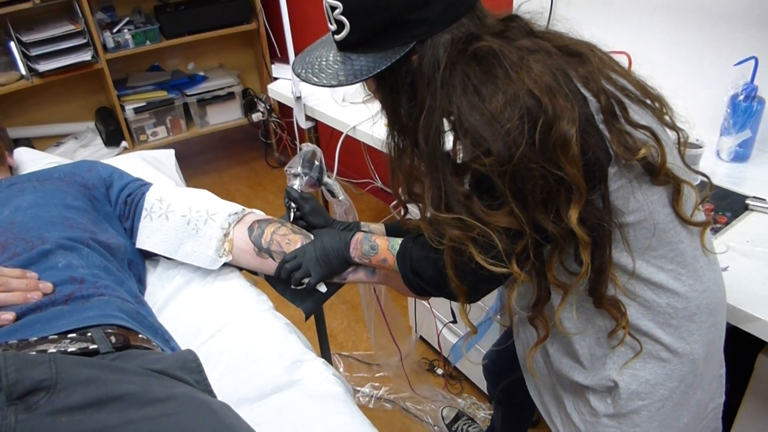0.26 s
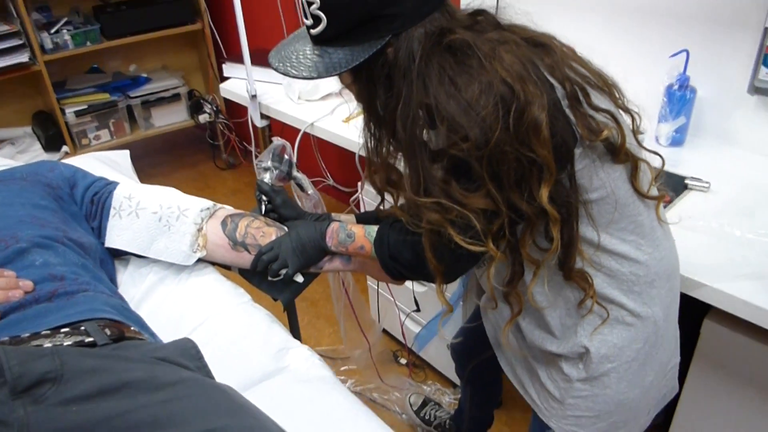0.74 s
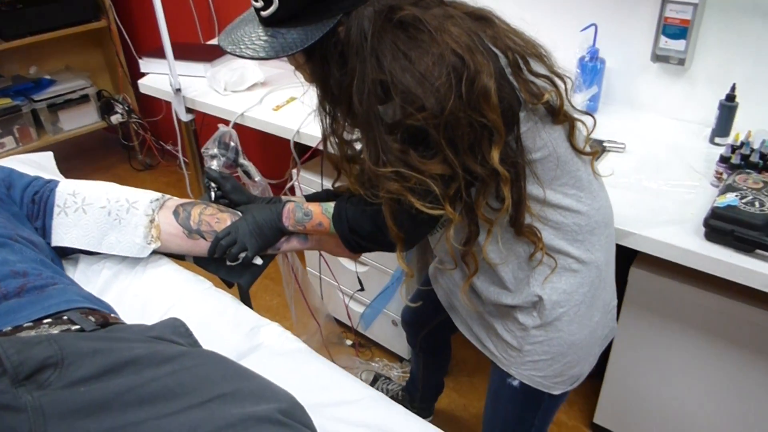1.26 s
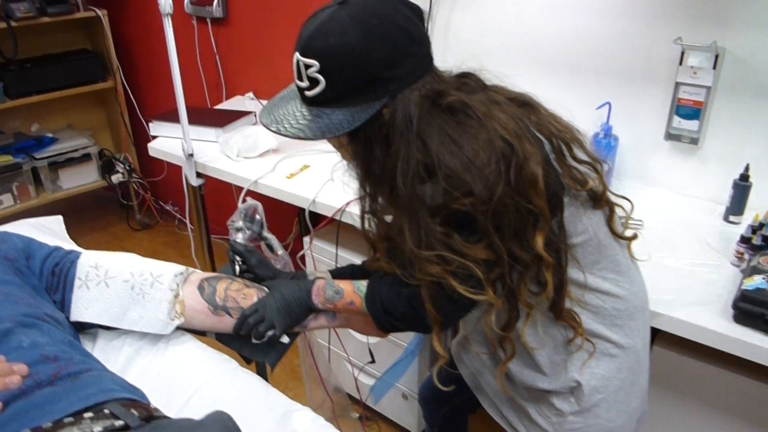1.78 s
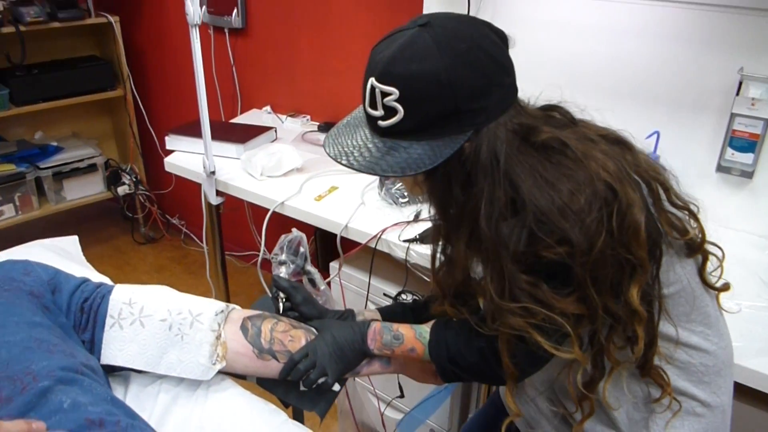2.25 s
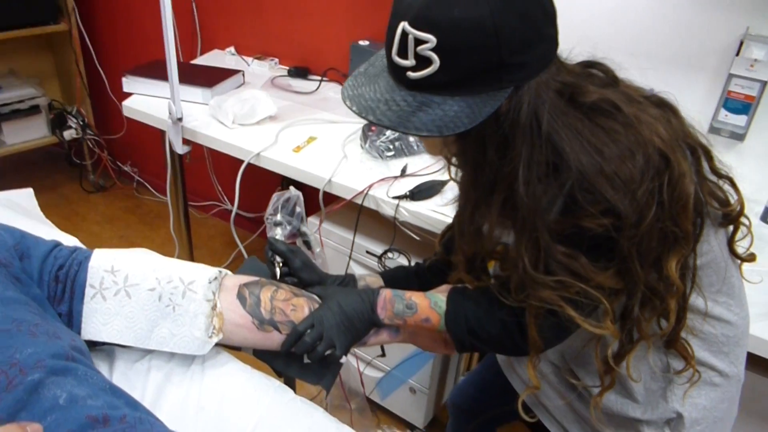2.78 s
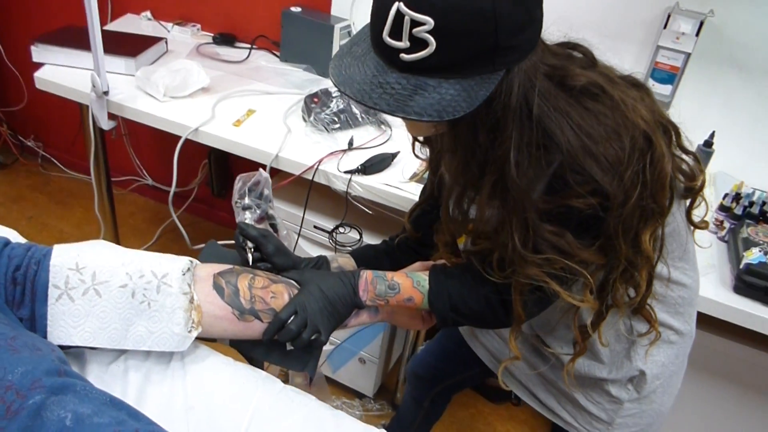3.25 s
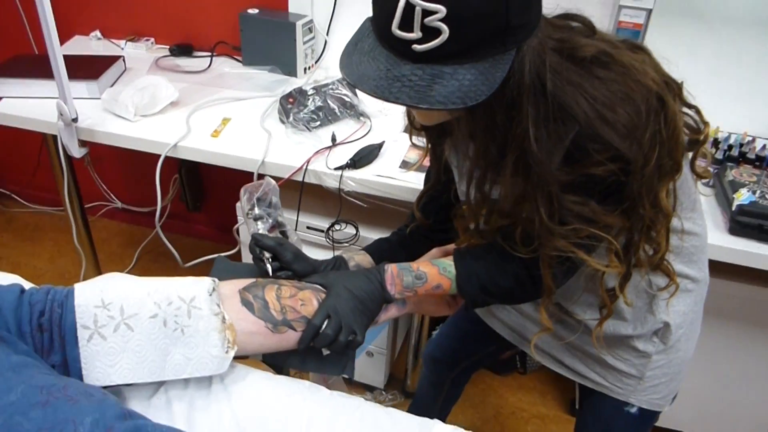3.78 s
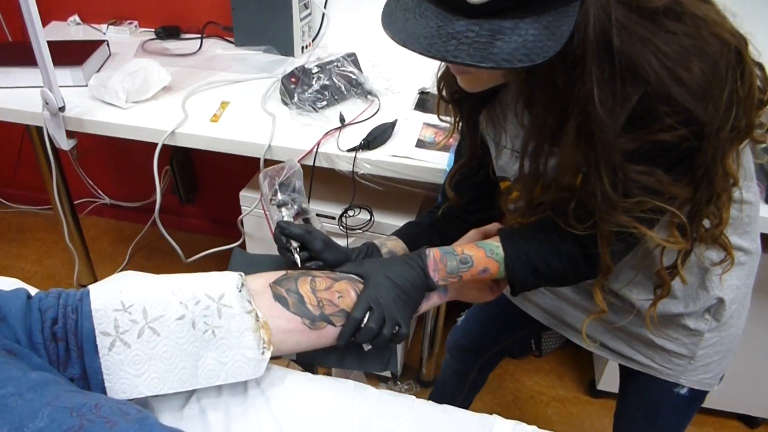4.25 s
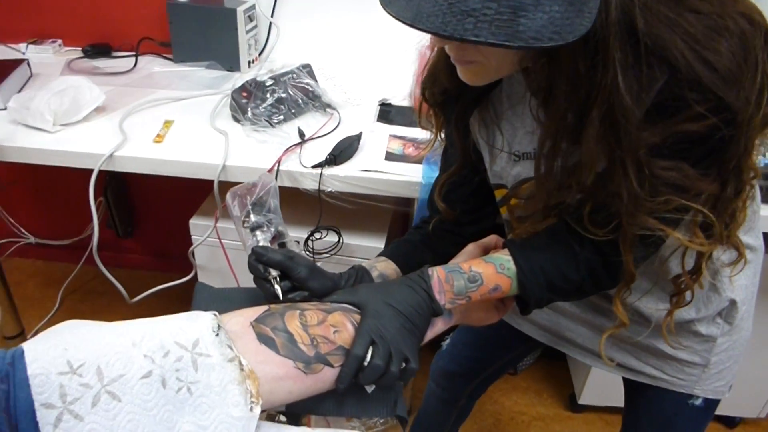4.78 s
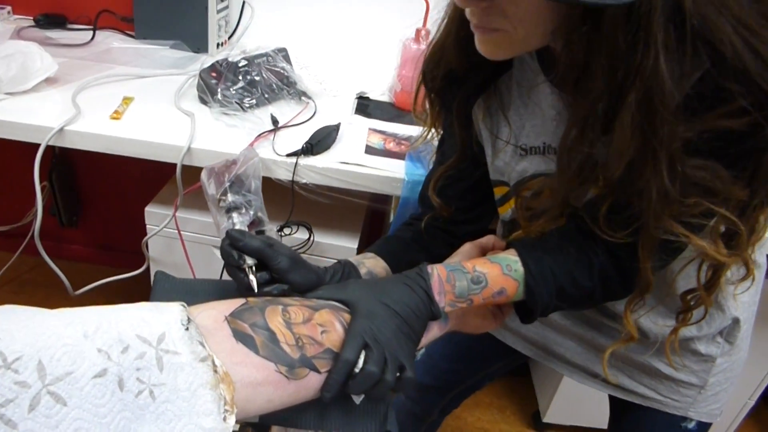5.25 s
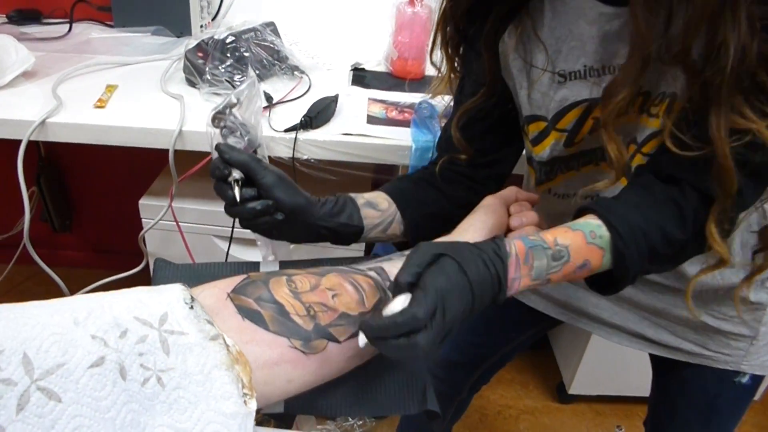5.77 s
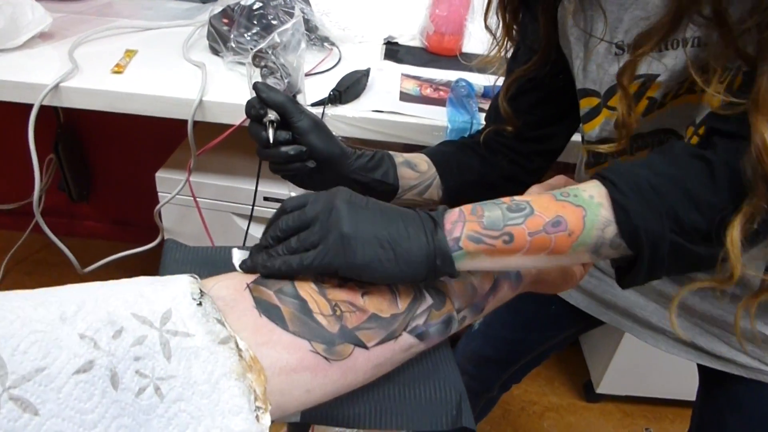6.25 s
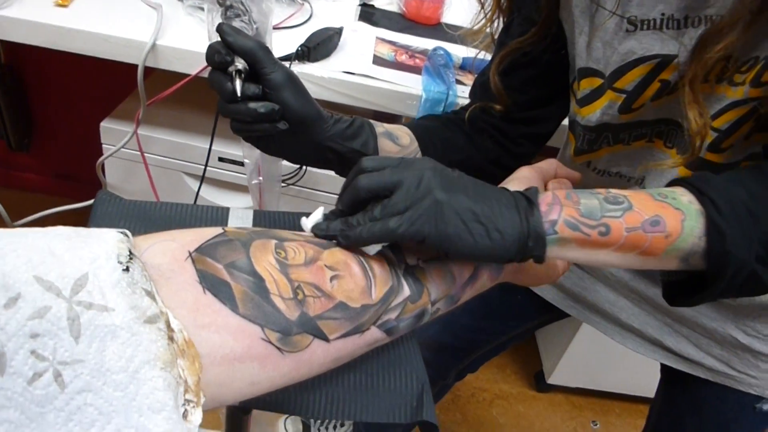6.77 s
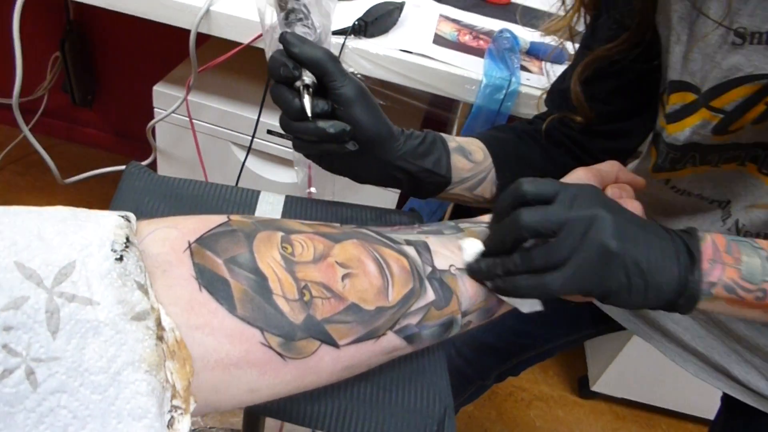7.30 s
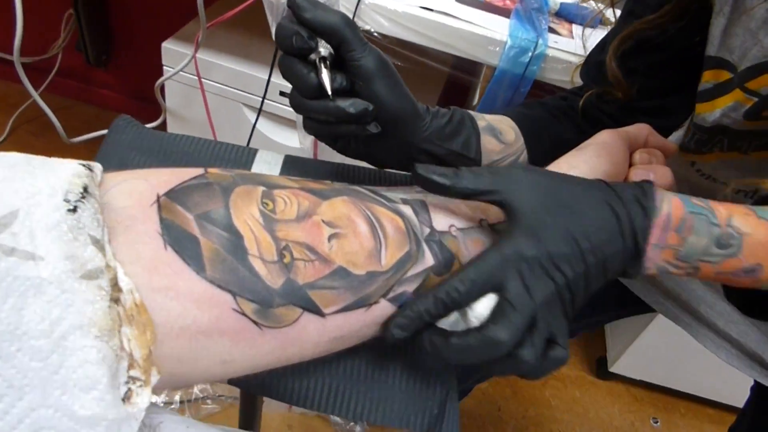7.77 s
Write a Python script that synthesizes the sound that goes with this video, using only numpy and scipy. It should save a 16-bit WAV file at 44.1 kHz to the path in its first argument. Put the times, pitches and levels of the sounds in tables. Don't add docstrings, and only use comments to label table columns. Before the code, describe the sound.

An electric tattoo machine buzzes without pause at a nearly constant low pitch, its rapid metal contacts making a bright, fizzy rasp. Faint hum lies beneath. Soft finger thumps knock the handheld camera, clustering before three seconds; a hard crack snaps near three and a half, then cloth rustles. The buzz comes closer and rings more freely toward the end in the small studio.

```python
import sys
import numpy as np
from scipy import signal
from scipy.fft import rfft, irfft, next_fast_len
from scipy.io import wavfile
from scipy.ndimage import uniform_filter1d, map_coordinates

SR = 44100
rng = np.random.default_rng(int(sys.argv[2]) if len(sys.argv) > 2 else 0)


def to_linear_factor(level_db):
    exponent = np.asarray(level_db, float) / 20
    return 10 ** exponent


def dump(signal):
    limited = np.clip(np.atleast_2d(signal).T, -1, 1)
    pcm = np.round(limited * 32767).astype(np.int16)
    wavfile.write(sys.argv[1], SR, pcm)


N = 354123


def unit(x):
    return x / np.sqrt(np.mean(x ** 2) + 1e-20)


def levelled(x):
    return x / np.sqrt(np.abs(uniform_filter1d(x[0] ** 2, size=15000)))


def along(points, hz):
    f, value = np.transpose(points)
    return np.interp(np.log(hz + 1), np.log(f + 1), value)


def curves(rows):
    seconds, *columns = np.transpose(rows)
    return [np.interp(np.arange(N) / SR, seconds, column) for column in columns]


def wobble(rate, at=None):
    grid = np.arange(0, N + 64, 64)
    knots = rng.standard_normal(int(N * rate / SR) + 4)
    coarse = map_coordinates(knots, [grid * rate / SR])
    return np.interp(np.arange(N) if at is None else at, grid, coarse)


def filtered(x, response):
    m = next_fast_len(N + SR // 2)
    return irfft(rfft(x, m) * response(np.fft.rfftfreq(m, 1 / SR)), m)[..., :N]


def padded(x):
    m = 2 * next_fast_len(N // 2 + SR // 4)
    return rfft(x, m), np.fft.rfftfreq(m, 1 / SR)


# (frequency [Hz], left minus right [dB])
LEFT = [(80, -7), (260, -3), (570, 4.5), (1050, 2.5), (2000, 0.05), (5500, 0.2), (10000, 2.5), (15500, 8)]
# (frequency [Hz], lead of the left [rad])
LEAD = [(150, -0.5), (370, 1), (560, 3), (1100, 3), (2800, 4), (3700, 4.5), (7500, 5), (16000, 5.5)]
# (frequency [Hz], left-right likeness [0-1])
ALIKE = [(300, 0.33), (800, 0.78), (2000, 0.96), (3000, 0.66), (4500, 0.98), (9000, 0.88), (14000, 0.98)]


def ports(x):
    def half(hz):
        return to_linear_factor(along(LEFT, hz) / 2) * np.exp(.5j * along(LEAD, hz))

    def right_mix(hz):
        turn = np.arccos(np.clip(along(ALIKE, hz), 0, 1))
        return np.array([np.cos(turn), np.sin(turn)]) / half(hz)

    right = filtered(x, right_mix).sum(axis=0)
    return np.array([filtered(x[0], half), right])


# (frequency [Hz], spectrum level [dB])
HUM = [(25, -23), (50, -12.5), (120, 1), (220, -2.5), (450, -7.5), (900, -6), (1650, 0.5), (2000, -8),
       (4000, -56)]


def room_tone():
    air = rng.standard_normal((2, N)) * to_linear_factor(1.86 * wobble(14) + 1.3 * wobble(1.56))
    return to_linear_factor(-51.0) * ports(unit(filtered(air, lambda hz: to_linear_factor(along(HUM, hz)))))


# (time [s], half length [s], level [dB])
RUSTLES = [
    (0.945, .04, -61),
    (1.2, .12, -74),
    (1.48, 0.03, -77),
    (2.626, 0.063, -50),
    (4.27, 0.057, -42.5),
    (5.78, .03, -57),
]
# (frequency [Hz], spectrum level [dB])
CLOTH = [(300, -12.5), (900, -3), (1700, 3), (4000, -26), (9000, -53)]


def rustles():
    t = np.arange(N) / SR
    stroke = sum(to_linear_factor(db) * np.exp(-((t - s) / half) ** 2) for s, half, db in RUSTLES)
    grains = rng.standard_normal((2, N)) * to_linear_factor(12.0 * wobble(60))
    return stroke * ports(unit(filtered(grains, lambda hz: to_linear_factor(along(CLOTH, hz)))))


def pushes(touches):
    push = np.zeros(N + SR)
    for s, db, contact_ms in touches:
        length = int(contact_ms * SR / 1200) + 2
        push[int(s * SR):][:length] += to_linear_factor(db) * np.hanning(length)
    return push[:N]


# (start [s], length [s], touch rate [1/s], level [dB])
FIDGETS = [
    (.2, .75, 7, -45),
    (3.39, .7, 12.2, -41.5),
    (4.85, 1, 5.2, -53),
    (6.401, .75, 14, -40),
    (7.584, .22, 11, -53),
]


def fidgets():
    contact_ms, spread_db = 4.45, 1
    touches = []
    for start, length, rate, db in FIDGETS:
        chance = rng.random((20, 3))
        times = start + (np.arange(20) + chance[:, 0]) / rate
        for s, (_, a, b) in zip(times, chance):
            if s < start + length:
                touches.append((s, db + spread_db * 2 * (2 * a - 1), contact_ms * (0.6 + 0.4 * b)))
    return touches


# (time [s], peak level [dB], contact [ms])
KNOCKS = [(0.625, -40, 5.3), (1.344, -37, 3.8), (1.955, -36, 1.7), (2.236, -32.5, 6.5), (2.415, -36.5, 5.6),
          (2.472, -33.5, 2.8), (2.653, -36.5, 4.6), (2.692, -29.5, 5.9), (2.718, -28.5, 6.7),
          (2.749, -32, 5.6), (2.777, -26, 5.2), (3.026, -30.5, 6.3), (3.208, -38.5, 8.1),
          (3.4613, -8.5, 0.91), (3.486, -24.5, 2.2), (4.08, -34.5, 6.6), (4.25, -25.5, 4.6),
          (4.436, -29.5, 7.2), (4.599, -33.5, 6.6), (4.66, -33.5, 5.8), (5.975, -27, 2.4), (6.06, -36, 4.3),
          (6.196, -35.5, 5), (6.616, -33, 7.3), (6.724, -35.5, 4.6), (6.754, -35, 5.5), (6.948, -29, 5.9),
          (7.367, -33.5, 3.2), (7.823, -30.5, 6.8), (7.874, -23, 5)]
# (time [s], peak level [dB], contact [ms])
TAPS = [
    (3.4614, -15.5, 0.27),
    (4, -48, 2.5),
    (4.2, -42, 2.7),
]


def knocks():
    def shell(f):
        swing = 1j * f / 170 / (1 - (f / 170) ** 2 + 1j * f / 170 / 1.17)
        return swing * (1j * f / 90 / (1 + 1j * f / 90))

    def snap(f):
        return shell(f) * 1j * f / 170 / (1 - (f / 750) ** 2 + 1j * f / 750 / 2.2)

    def far_port(f):
        return .25 - 0.16 * (1j * f / 800 / (1 + 1j * f / 800)) ** 2

    def crack(f):
        centre_hz, wide_hz = 1100, 1400
        return (1j * f * wide_hz / (centre_hz ** 2 - f * f + 1j * f * wide_hz)) ** 2

    right = to_linear_factor(5.0) * filtered(pushes(KNOCKS + fidgets()), shell)
    right += to_linear_factor(3.5) * filtered(pushes(TAPS), snap)
    cracks = to_linear_factor(6) * filtered(pushes(TAPS), crack) * [[1], [0.28]]
    return np.array([filtered(right, far_port), right]) + cracks


# (frequency [Hz], t60 [s])
STUDIO = [(300, 0.34), (2000, 0.11), (10000, 0.091)]


def tails(count, speedup):
    noise = rng.standard_normal((2, count, SR // 8))
    hz, t, z = signal.stft(noise, SR, nperseg=128)
    decay = to_linear_factor(-60 * speedup * t / along(STUDIO, hz)[:, None])
    return signal.istft(z * decay, SR, nperseg=128)[1]


def shifting(x, speedup, hop_s):
    hop = int(hop_s * SR)
    steps = N // hop + 2
    pieces = np.pad(x, (hop, (steps + 1) * hop - N))
    pieces = np.lib.stride_tricks.sliding_window_view(pieces, 2 * hop)[::hop][:steps]
    pieces = pieces * np.sin(np.pi * np.arange(2 * hop) / (2 * hop))
    wet = signal.fftconvolve(pieces[None], tails(steps, speedup), axes=2)
    out = np.zeros((2, (steps + 3) * hop + wet.shape[2]))
    for k in range(steps):
        out[:, k * hop:k * hop + wet.shape[2]] += wet[:, k]
    return unit(out[:, hop:hop + N])


# (time [s], rate [Hz])
SPEED = [
    (0.0, 109.7),
    (1.38, 108.4),
    (1.7, 109.5),
    (2.59, 109.2),
    (5.01, 109.5),
    (6.22, 110.8),
    (8.03, 109.2),
]


def cycles():
    return np.cumsum(curves(SPEED)[0] * (1 + 0.00051 * wobble(5))) / SR


def clicks(at, size):
    index = np.floor(at)[:, None] + np.arange(-7, 9)
    off = index - at[:, None]
    shape = np.sinc(off) * np.cos(np.pi * off / 16) ** 2
    index = np.clip(index, 0, N).astype(int)
    return np.bincount(index.ravel(), (shape * size[:, None]).ravel(), N + 1)[:N]


# (share of stroke [0-1], level [dB], low edge [Hz], high edge [Hz], timing scatter [us])
CONTACTS = [
    (0, 4.5, 1870, 8570, 1.8),
    (0.089, -8, 3600, 15000, 3.5),
    (0.172, 2.5, 10260, 16100, 1.1),
    (0.301, -6.5, 10800, 15400, 2.1),
    (0.398, -3, 3690, 6100, 1.6),
    (.53, 3.5, 7100, 11930, 2.3),
    (.66, 0, 11700, 15700, 4),
    (0.821, -2, 8640, 16600, 3),
]


def strokes(turns):
    steel = np.zeros(N)
    for share, db, low_hz, high_hz, scatter_us in CONTACTS:
        at = np.interp(np.arange(turns[-1]) + share, turns, np.arange(N))
        chance = rng.standard_normal((len(at), 2))
        size = to_linear_factor(db + 0.39 * chance[:, 1] + 3.2 * wobble(2.44, at))
        late_us = scatter_us * chance[:, 0] + 10 * wobble(2.032, at)
        at = at + SR * 1e-6 * late_us
        band = signal.butter(2, [low_hz, high_hz], "band", fs=SR, output="sos")
        steel += signal.sosfilt(band, clicks(at, size))
    rattle = rng.standard_normal(N) * uniform_filter1d(np.abs(steel), size=120)
    return unit(steel) + to_linear_factor(-15.0) * unit(np.diff(rattle, prepend=0))


def lifted():
    middle_s, lasts_s = 5.9, 2.3
    return np.clip((np.arange(N) / SR - middle_s) / lasts_s + .5, 0, 1)


# (time [s], nearness as treble level [dB], turn of the tube side towards the ports [dB])
REACH = [(0.0, -37, 1), (0.87, -38.5, 1), (1.03, -36.5, 3), (1.07, -40, 3.5), (1.97, -36, 1.5),
         (2.06, -37, 1), (2.93, -35.5, 0), (3.06, -34.5, -0.5), (4.23, -35.5, 1), (5.61, -32, 0.5),
         (6.31, -35, 4), (6.62, -29.5, -1), (6.69, -33, -0.5), (7.18, -31.5, 0), (7.4, -34.5, -1),
         (7.83, -31.5, -2), (8.03, -33, 2.5)]


def part_level(over_db, near, turn, lift_db, waver_db):
    reach_db, turn_db = curves(REACH)
    mean_db = reach_db.mean()
    path_db = mean_db + over_db + near * (reach_db - mean_db) + turn * turn_db
    return path_db + lift_db * lifted() + waver_db * wobble(5)


# (level over the reach [dB], share of nearness [ratio], share of turn [ratio],
# gain when lifted [dB], waver [dB])
PARTS = [
    (-16.5, 0.42, .3, 4.5, -0.27),
    (-7.5, 0.69, 1.1, 3, 1.3),
    (-9, 0.21, .6, 4, 0.44),
    (0.2, 0.9, .05, 0.9, .5),
]
# (multiple of stroke rate, level in skin [dB], level lifted [dB])
ORDERS_DB = [(3, -71.5, -70), (4, -78, -86), (5, -65, -62.5), (6, -73, -77), (7, -71, -77), (8, -65.5, -62),
             (9, -60.5, -64.5), (10, -56, -55.5), (11, -54.5, -54), (12, -57.5, -59.5), (13, -59.5, -54),
             (14, -55, -50.5), (15, -53.5, -47), (16, -58, -42.5), (17, -62, -66), (18, -61.5, -63.5)]


def frame_tone(turns):
    free, tone = lifted(), np.zeros((2, N))
    for multiple, skin_db, free_db in ORDERS_DB:
        lag = 2 * np.arctan((multiple - 14) / 2.3) + rng.normal(0, 0.6)
        lag = lag + [[0], [1]] * (np.pi / 2 + 0.83 * wobble(1.8))
        level_db = skin_db + (free_db - skin_db) * free + 2.8 * wobble(1.574)
        tone += to_linear_factor(level_db) * np.cos(2 * np.pi * multiple * turns - lag)
    return levelled(tone) * to_linear_factor(part_level(-11.5, *PARTS[0][1:]))


# (frequency [Hz], spectrum level [dB])
FRAME = [(400, -45), (1100, -18.5), (1750, -14.5), (2300, -22.5), (3300, -14.5), (3800, -8), (4150, -13),
         (4900, -2.5), (5900, -11), (10900, 0), (12800, 0), (13350, -8.5), (14200, 4), (14800, -6.5)]
PARTS_HZ = [1500, 4600, 8000, 12000]


def machine():
    turns = cycles()
    steel = strokes(turns)
    walls = unit(signal.fftconvolve(steel[None], tails(count=1, speedup=0.72)[:, 0], axes=1)[:, :N])
    moving = shifting(steel, speedup=1.96, hop_s=.14)
    moving = filtered(moving, lambda hz: hz / np.hypot(hz, 3000))
    both = steel * [[1], [0]] + to_linear_factor(-5) * walls + to_linear_factor(-1.5) * moving
    both += to_linear_factor(-9.0) * np.diff(rng.standard_normal((2, N + 1))) * [[1], [2.2]]
    spectrum, hz = padded(both)
    spectrum = spectrum * to_linear_factor(along(FRAME, hz))
    out = frame_tone(turns)
    for rule, weights in zip(PARTS, np.eye(4)):
        band = along(list(zip(PARTS_HZ, weights)), hz)
        part = irfft(spectrum * band)[:, :N]
        out = out + levelled(part) * to_linear_factor(part_level(*rule))
    return ports(out)


def scene():
    return machine() + knocks() + rustles() + room_tone()


def band_limit(x):
    return signal.sosfilt(signal.butter(12, 17070, fs=SR, output="sos"), x)


def record(dry):
    mix = filtered(dry, lambda hz: hz < 15750)
    return band_limit(mix)


dry = scene()
out = record(dry)
dump(out)
```